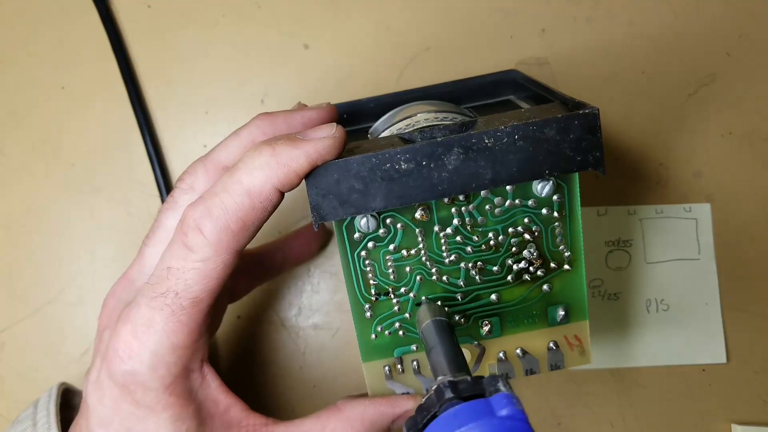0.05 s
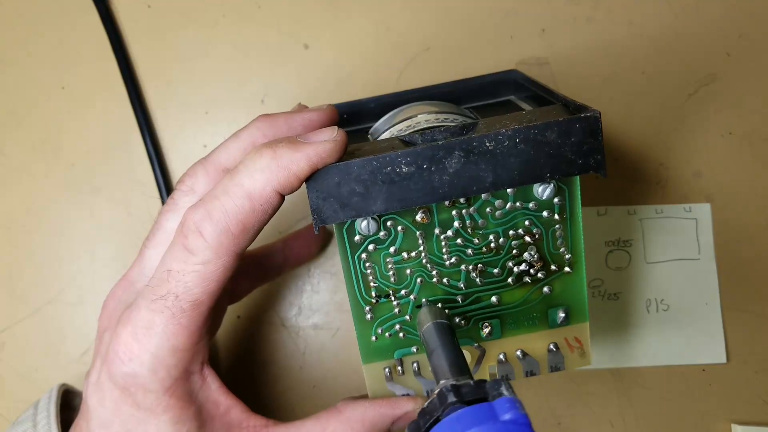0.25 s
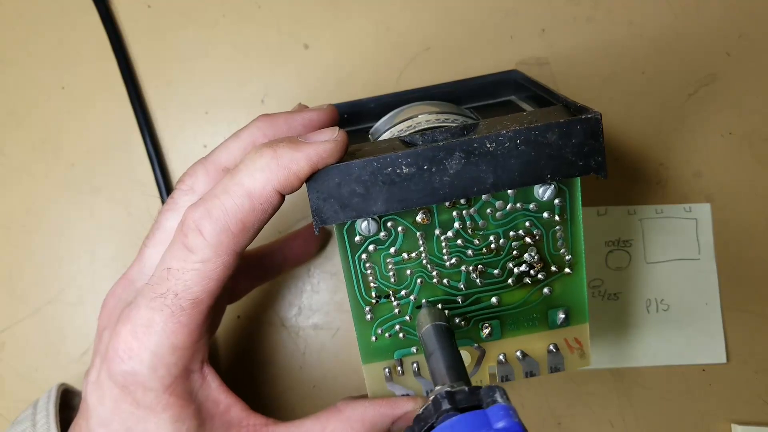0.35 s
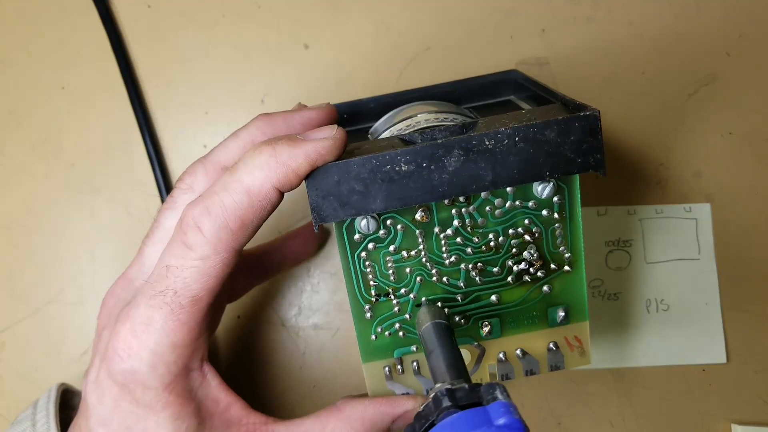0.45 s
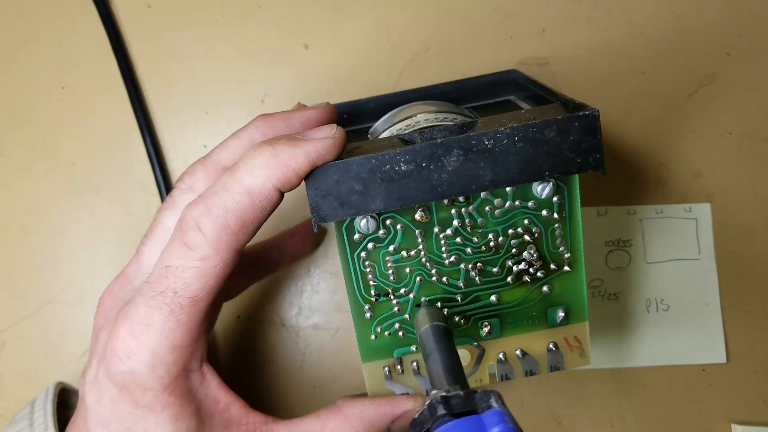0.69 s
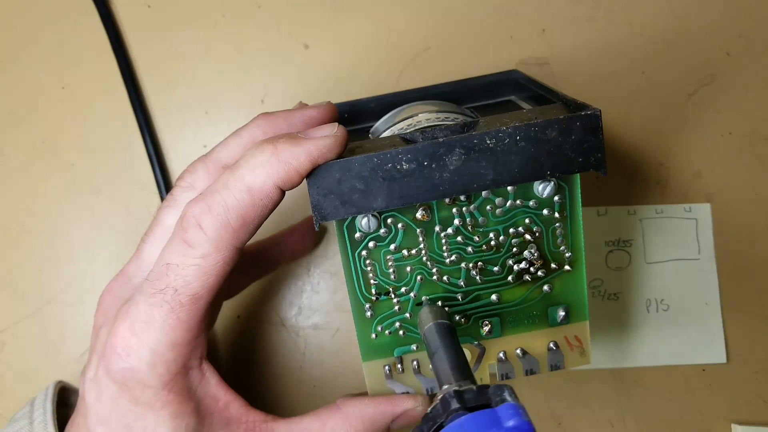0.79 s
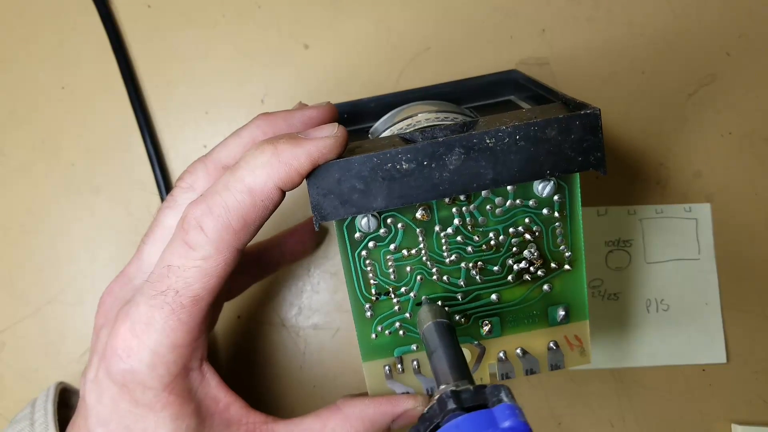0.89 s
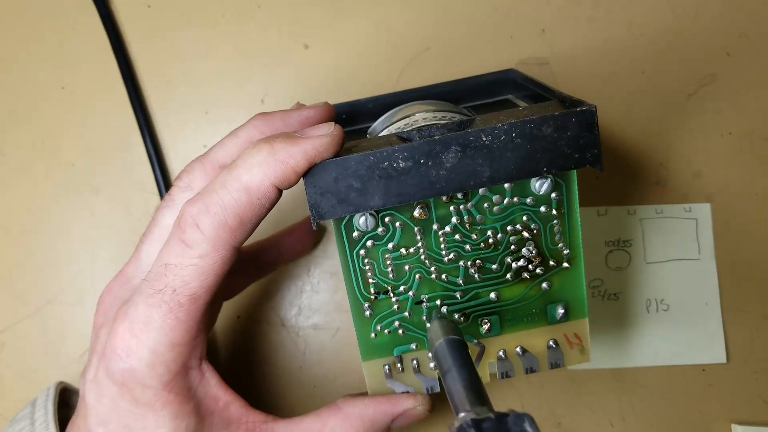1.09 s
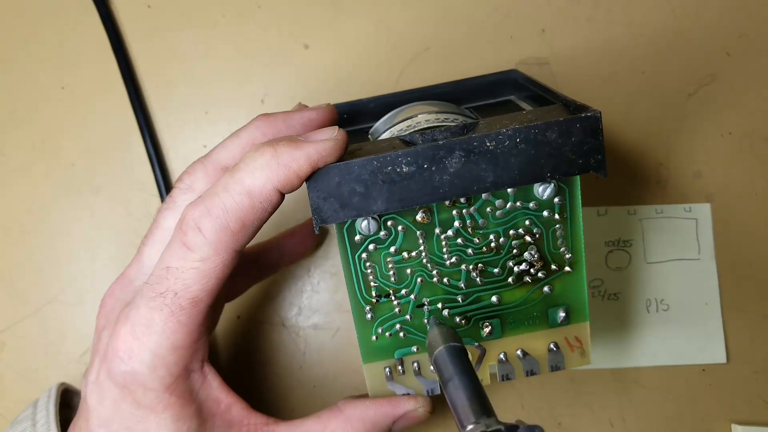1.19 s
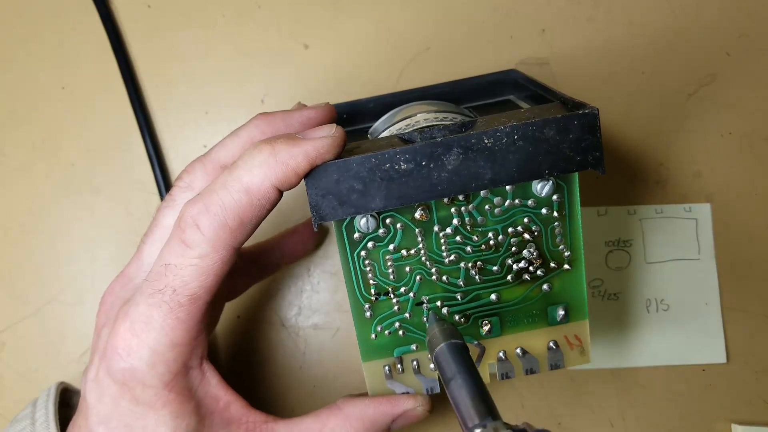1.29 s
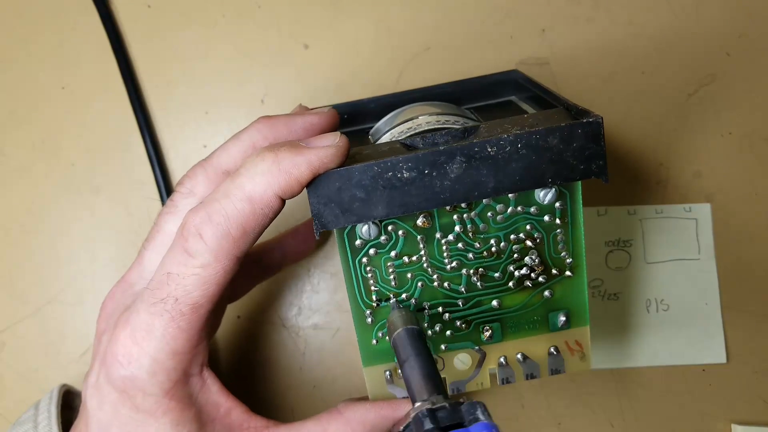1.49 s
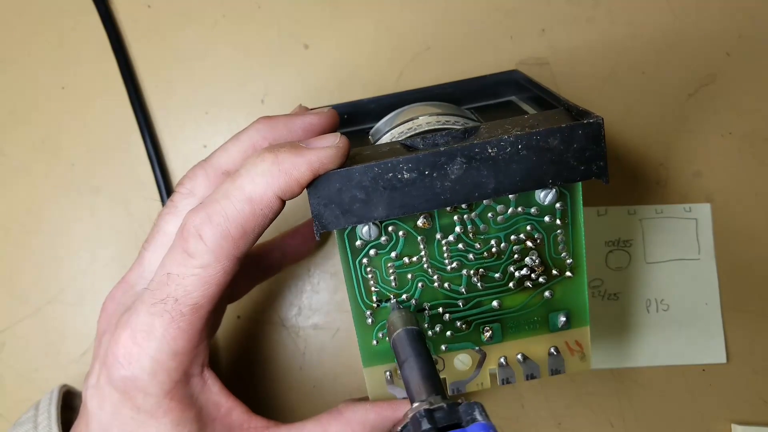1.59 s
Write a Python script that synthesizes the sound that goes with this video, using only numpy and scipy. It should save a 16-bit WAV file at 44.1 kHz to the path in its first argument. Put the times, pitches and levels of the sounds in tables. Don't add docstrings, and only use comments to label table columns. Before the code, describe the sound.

After a brief quiet rumble and a trigger click, a vacuum pump bursts into a rapid popping buzz with hissing suction, steadies for about a second and halts, heard close up at an indoor workbench.

```python
import sys
import numpy as np
from scipy import signal
from scipy.fft import rfft, irfft
from scipy.io import wavfile
from scipy.ndimage import uniform_filter1d

SR = 44100
rng = np.random.default_rng(int(sys.argv[2]) if len(sys.argv) > 2 else 0)


def decibels_to_gain(level_db):
    exponent = np.asarray(level_db, float) / 20
    return 10 ** exponent


def transcribe(u):
    v = np.clip(np.atleast_2d(u).T, -1, 1)
    q = np.round(v * 32767).astype(np.int16)
    wavfile.write(sys.argv[1], SR, q)


N = 72765

FIRST_POP_S, STOP_S = 0.21222, 1.305
MAX_TURNS = 90
INTAKE_TURN = 0.43
LOW_PAN_DB = -7.5


def level(x, db):
    return x * decibels_to_gain(db) / np.sqrt(np.mean(x ** 2))


def pan(x, db):
    return x * decibels_to_gain(np.array([[db / 2], [-db / 2]]))


def ring(x, hz, t60):
    pole = np.exp(2j * np.pi * hz / SR - np.log(1000) / (t60 * SR))
    return signal.lfilter([1], [1, -pole], x)


def band(x, hz, width_hz):
    edges = [max(hz - width_hz / 2, 50), min(hz + width_hz / 2, 0.45 * SR)]
    return signal.sosfilt(signal.butter(2, edges, "band", fs=SR, output="sos"), x)


def coloured(points, alike_hz):
    f = np.arange(N // 2 + 1) * SR / N + 1
    hz, db = np.array(points).T
    gain = decibels_to_gain(np.interp(np.log(f), np.log(hz), db, left=-60, right=-80))
    mid, side = rfft(rng.standard_normal((2, N)))
    side = side * np.array([[1], [-1]]) / np.sqrt(1 + (alike_hz / f) ** 2)
    return level(irfft(gain * (mid + side), N), 0)


def hits(turns, offset, gain):
    k = np.arange(len(gain))
    at = np.interp(k + offset, turns, np.arange(N), right=N - 2)
    i = at.astype(int)
    gain = gain * (at < STOP_S * SR)
    out = np.zeros(N)
    np.add.at(out, i, gain * (1 - at + i))
    np.add.at(out, i + 1, gain * (at - i))
    return out


def pulse(clicks, width_s):
    s = np.arange(-90, 91) / SR
    return np.convolve(clicks, np.exp(-0.5 * (s / width_s) ** 2), "same")


def sizes(scatter_db):
    return decibels_to_gain(scatter_db * rng.standard_normal(MAX_TURNS))


def per_turn(values, turns):
    return values[np.clip(turns, 0, MAX_TURNS - 1).astype(int)]


def cage():
    return np.cos(2 * np.pi * 0.338 * (np.arange(MAX_TURNS) - 41))


# (frequency [Hz], density [dB per Hz])
RUMBLE_SPECTRUM = [(25, -10), (119, -3.5), (190, -15), (300, -25.5), (620, -35), (1400, -50.5),
                   (2600, -45.5), (4500, -62)]


def rumble():
    room = coloured(RUMBLE_SPECTRUM, 810)
    bass = signal.sosfiltfilt(signal.butter(1, 1200, fs=SR, output="sos"), room)
    hiss = decibels_to_gain(-73) * rng.standard_normal((2, N))
    return level(pan(bass, -8.5) + room - bass, -44) + hiss


def reverberate(dry):
    t60_s, first_reflection_s, wet_db = 0.33, 0.004, -20
    u = np.arange(SR // 2) / SR
    tail = rng.standard_normal((2, len(u))) * decibels_to_gain(-60 * u / t60_s) * (u > first_reflection_s)
    tail = tail / np.sqrt((tail ** 2).sum(1, keepdims=True))
    return decibels_to_gain(wet_db) * signal.fftconvolve(dry, tail, axes=1)[:, :N]


# (time [s], level [dB], centre [Hz], width [Hz], t60 [s])
TICK_BURSTS = [(0.1624, -63, 9500, 3020, 0.06), (0.1828, -36.5, 11900, 5540, .05),
               (0.184, -48.5, 5780, 900, 0.086), (0.2177, -21, 8500, 900, 0.016),
               (0.193, -47.5, 1500, 2630, .1), (0.2374, -28, 11000, 8690, .02),
               (.3504, -40, 11000, 8000, 0.027), (0.488, -36.5, 14500, 3030, 0.044),
               (1.2692, -28.5, 10500, 3520, 0.025), (1.2688, -43, 13500, 4500, .04),
               (1.2995, -68, 3000, 4040, .03)]


def ticks(t):
    out = 0
    for s, db, hz, width_hz, t60 in TICK_BURSTS:
        noise = rng.standard_normal((3, N))
        burst = level(band(noise[:2] + 0.7 * noise[2], hz, width_hz), db)
        out = out + pan(burst * (t >= s) * decibels_to_gain(-60 * np.abs(t - s) / t60), -3)
    late = np.clip(t - 0.183, 0, None)
    nudge = decibels_to_gain(-30 - 60 * late / 0.051) * np.sin(2 * np.pi * 102 * late)
    return out - pan(nudge, LOW_PAN_DB)


# (frequency [Hz], density [dB per Hz])
AIR_SPECTRUM = [(500, -4), (1200, -0.5), (2100, 0.5), (2800, -10.5), (5000, -15.5), (7400, -18.5),
                (10000, -19.5), (16500, -35)]


def air(turns, force, rush):
    puff_turns, leak = 0.27, 0.12
    out_size = per_turn(sizes(1.2), turns)
    in_size = per_turn(sizes(1.2) * decibels_to_gain(8.5 * cage()), turns)
    puff = leak + out_size * np.exp(-(turns % 1) / puff_turns)
    puff = puff + 0.27 * in_size * np.exp(-((turns - INTAKE_TURN) % 1) / puff_turns)
    puff = uniform_filter1d(puff, size=30)
    noise = rng.standard_normal((2, N))
    whistle = level(band(noise + 0.4 * noise[0], 8680, 750), -47) * decibels_to_gain(12 * rush)
    hiss = coloured(AIR_SPECTRUM, 3000) * decibels_to_gain(-31 - 3.5 * rush)
    return pan((hiss + whistle) * puff * force, -2.5)


def spit(turns, force, rush):
    gate = np.exp(-((turns - 0.36) % 1) / 0.18) * rush ** 4.2 * force
    gate = uniform_filter1d(gate * per_turn(sizes(1.5), turns), size=40)
    noise = rng.standard_normal((3, N))
    spray = band(noise[:2] + 0.6 * noise[2], 11000, 9000) + band(noise[:2], 5800, 1200)
    knock = sum(band(noise[2], hz, 250) for hz in (680, 900, 1320, 1800))
    return pan(level(spray, -30) * gate, -5) + pan(level(knock, -20.5) * gate, -1.5)


# (frequency [Hz], t60 [s], level [dB], left minus right [dB])
INTAKE_MODES = [(340, 0.017, -38, -12), (909.6, 0.11, -7.5, -6.5), (1990, 0.014, 3.5, -2.5),
                (2740, 0.016, -14, -0.5), (3380, 0.012, -10, -22), (3890, 0.036, -25.5, 12),
                (4900, 0.0098, -14, -13), (8380, 0.0034, -12.5, -19)]


def intake(turns, force, rush):
    load = cage()
    slap = hits(turns, INTAKE_TURN - 0.0072 * load, decibels_to_gain(2 * load) * sizes(1.0))
    slap = slap * force * decibels_to_gain(-7.5 * rush)
    slap = slap * np.clip(np.gradient(turns) * SR / 71, 0, 1) ** 6
    rattle_s = 0.006
    rattle = signal.lfilter([1], [1, -np.exp(-1 / (rattle_s * SR))], slap)
    out = 0
    for hz, t60, db, pan_db in INTAKE_MODES:
        a, b = rng.standard_normal((2, N)) * hz / 3000
        centre = pan(ring(slap + 0.057 * rattle * a, hz, t60).imag, pan_db)
        spread = ring(0.045 * rattle * b, hz, t60).imag * np.array([[1], [-1]])
        out = out + decibels_to_gain(db) * (centre + spread)
    return decibels_to_gain(-26) * signal.lfilter(*signal.butter(1, 5000, fs=SR), out)


def diaphragm(turns, force, rush):
    saw = np.sqrt(12) * (turns % 1 - 0.5)
    pressure = decibels_to_gain(-42 + 2 * rush) * signal.lfilter(*signal.butter(1, 500, fs=SR), saw)
    speed = np.gradient(turns) * SR / 76.8
    shake = decibels_to_gain(-30.5) * speed ** 10.6 * np.sin(2 * np.pi * turns)
    shake = shake + decibels_to_gain(-45) * np.sin(4 * np.pi * turns)
    suck = decibels_to_gain(-23.5) * pulse(hits(turns, 0.352, sizes(0.5)), 0.000092)
    thud = decibels_to_gain(-30.5) * pulse(hits(turns, 0.594, cage()), 0.00024)
    return pan((pressure - np.sqrt(2) * (shake - thud) - suck) * force, LOW_PAN_DB)


# (frequency [Hz], t60 [s], level [dB], extra level while air rushes [dB], left minus right [dB])
HOUSING_MODES = [(467.6, 0.068, -25, -2, -23), (660.2, 0.091, -13.5, 17.5, -9.5),
                 (817, 0.093, -22.5, 18, -1), (876, 0.032, -3.5, 4, -16.5), (951, 0.015, -1.5, -11, -14),
                 (1027, 0.053, -6.5, -9.5, -2.5), (1320, 0.03, -4.5, 7.5, -8.5), (1605, 0.011, 6.5, -1, -6),
                 (1924, 0.031, 4.5, -3.5, -3.5)]
# (frequency [Hz], width [Hz])
ANTIRESONANCES = [(580, 73), (735, 21), (1170, 60)]


def exhaust(turns, force, rush):
    width_s = 0.00012
    area = width_s * SR * np.sqrt(2 * np.pi)

    def pop(turn, scatter_db):
        return pulse(hits(turns, turn, sizes(scatter_db)) * force, width_s)

    bounce = pop(0.2192, 0.7) * decibels_to_gain(-16.5 * rush)
    direct = decibels_to_gain(-14) * (pop(0, 0.5) + decibels_to_gain(7) * bounce)
    chamber = decibels_to_gain(1) * ring(pop(0, 0.5) / area * decibels_to_gain(1 * rush), 273, 0.019).imag
    out = pan(direct - chamber, LOW_PAN_DB)
    for hz, t60, db, rush_db, pan_db in HOUSING_MODES:
        strike = pop(0, 0.5) + decibels_to_gain(-12.5) * bounce
        mode = ring(strike / area * decibels_to_gain(rush_db * rush), hz, t60).real
        out = out + pan(decibels_to_gain(db) * mode, pan_db)
    for hz, width_hz in ANTIRESONANCES:
        out = signal.lfilter(*signal.iirnotch(hz, hz / width_hz, fs=SR), out)
    return decibels_to_gain(-24) * out


# (time [s], speed [turns per s])
SHAFT_SPEED = [(0.212, 43.38), (0.25, 55.49), (0.3, 61.87), (0.36, 65.32), (0.44, 68.84), (0.52, 71.3),
               (0.6, 72.65), (0.75, 72.8), (0.9, 72.58), (1.05, 72.0), (1.2, 71.15), (1.262, 71.28),
               (1.275, 64.94), (1.31, 22.19)]


def shaft(t):
    turns = np.cumsum(np.interp(t, *np.array(SHAFT_SPEED).T)) / SR
    return turns - np.interp(FIRST_POP_S, t, turns)


# (time [s], level [dB])
STROKE_LEVEL = [
    (.212, -7.5),
    (.235, 1),
    (.3, 3),
    (.5, 1.5),
    (.8, 1),
    (1.2, 1),
    (1.265, 2),
    (1.293, -4.5),
    (1.31, 2),
]


def stroke(t):
    start = np.clip((t - FIRST_POP_S + 0.002) / 0.001, 0, 1)
    stop = np.clip((STOP_S + 0.015 - t) / 0.02, 0, 1)
    return decibels_to_gain(np.interp(t, *np.array(STROKE_LEVEL).T)) * start * stop


def scene():
    t = np.arange(N) / SR
    turns, force = shaft(t), stroke(t)
    rush = np.exp(-np.clip(t - 0.25, 0, None) / 0.16)
    dry = ticks(t) + air(turns, force, rush) + spit(turns, force, rush)
    dry = dry + intake(turns, force, rush) + diaphragm(turns, force, rush) + exhaust(turns, force, rush)
    return dry + reverberate(dry) + rumble()


def band_limit(x):
    return signal.sosfilt(signal.butter(12, 16220, fs=SR, output="sos"), x)


def record(dry):
    x = signal.sosfilt(signal.butter(1, 40, "high", fs=SR, output="sos"), dry)
    dip_hz, dip_width_hz = 7590, 570
    x = signal.lfilter(*signal.iirnotch(dip_hz, dip_hz / dip_width_hz, fs=SR), x)
    mix = signal.sosfilt(signal.ellip(10, 0.2, 70, 15750, fs=SR, output="sos"), x)
    return band_limit(mix)


dry = scene()
out = record(dry)
transcribe(out)
```